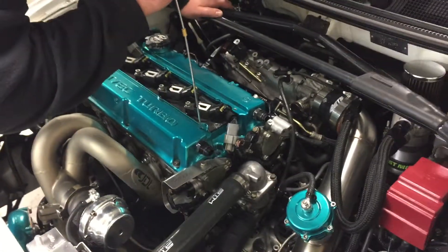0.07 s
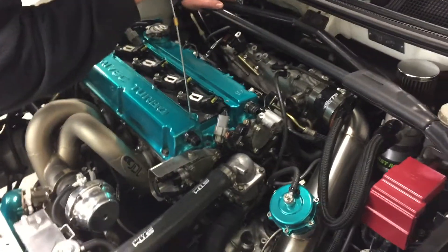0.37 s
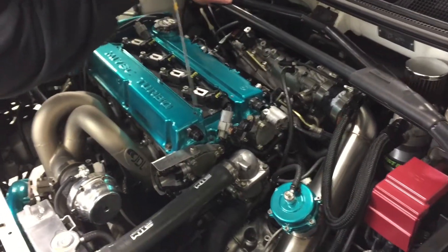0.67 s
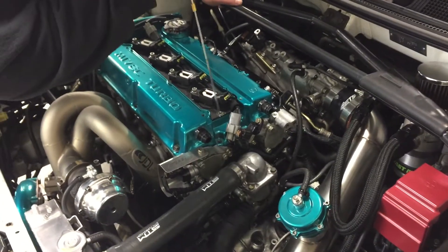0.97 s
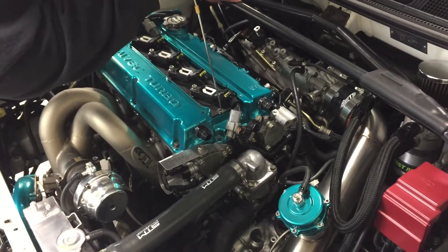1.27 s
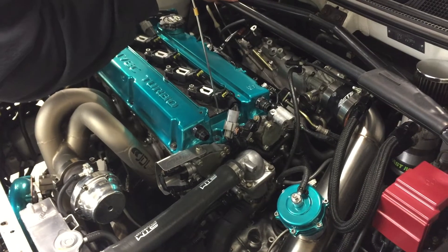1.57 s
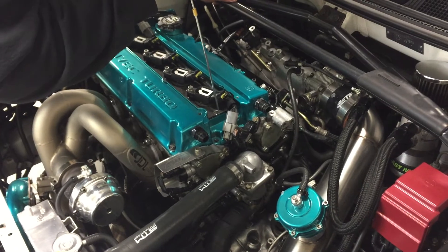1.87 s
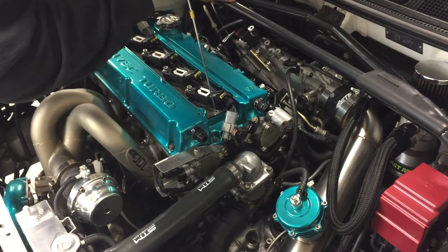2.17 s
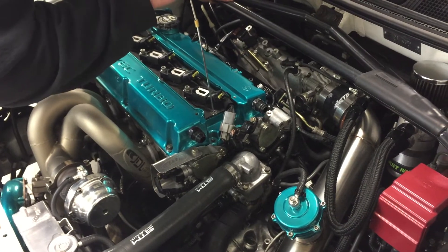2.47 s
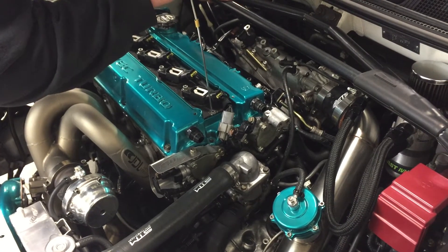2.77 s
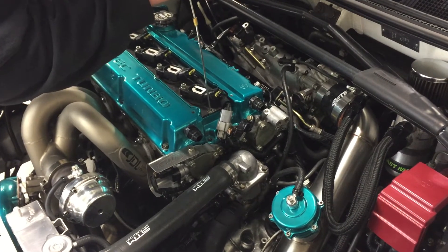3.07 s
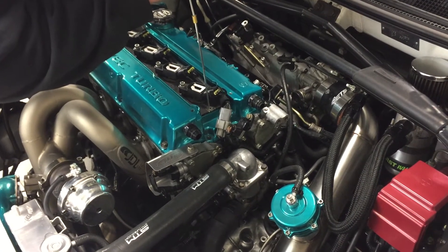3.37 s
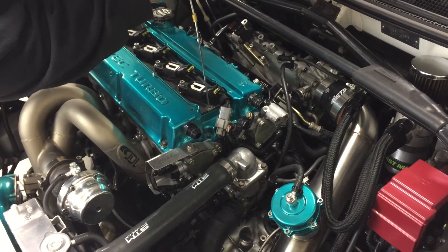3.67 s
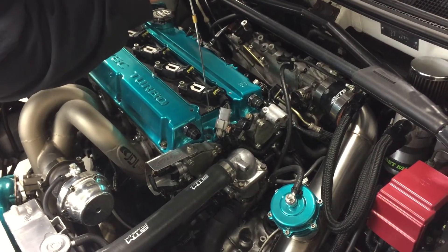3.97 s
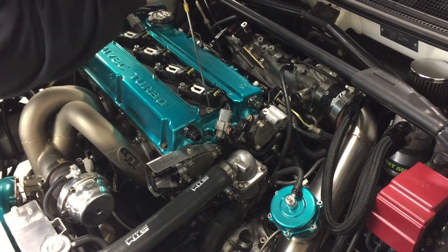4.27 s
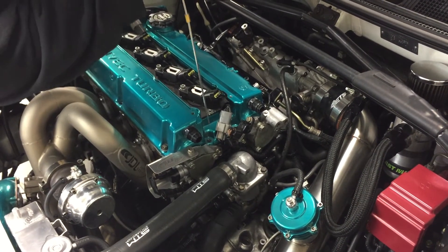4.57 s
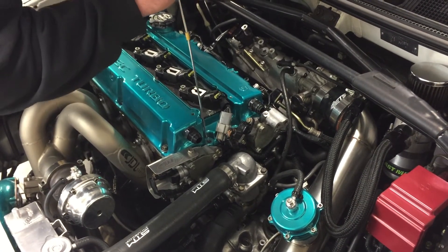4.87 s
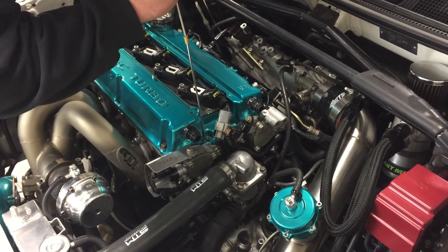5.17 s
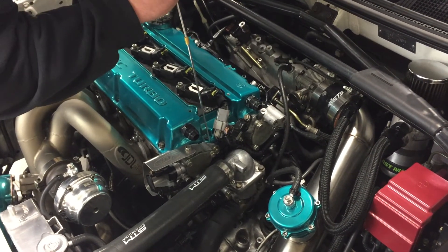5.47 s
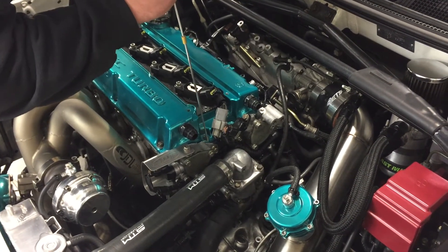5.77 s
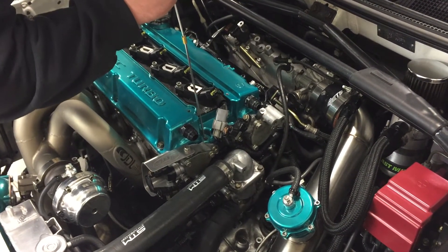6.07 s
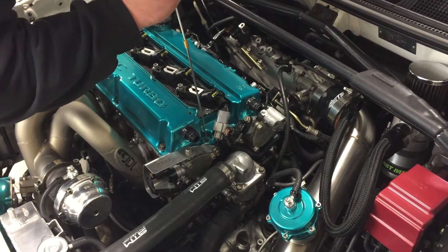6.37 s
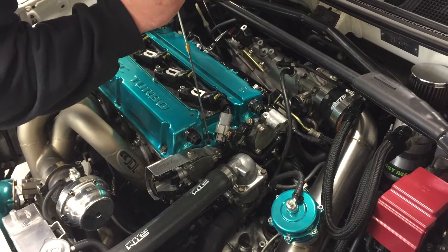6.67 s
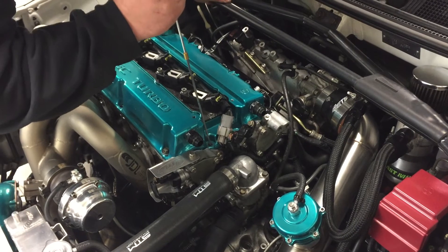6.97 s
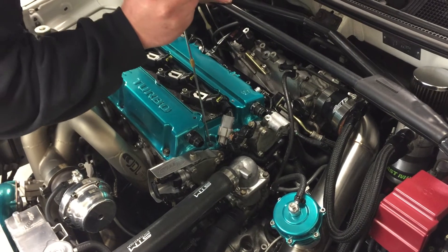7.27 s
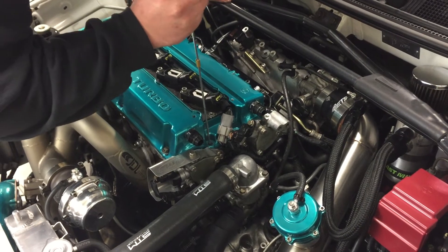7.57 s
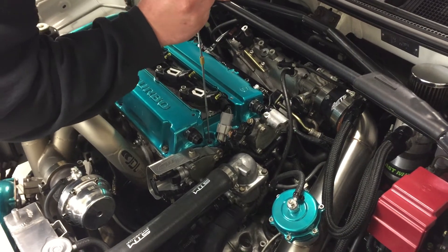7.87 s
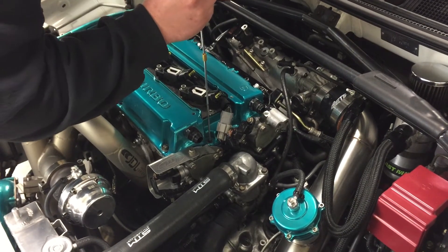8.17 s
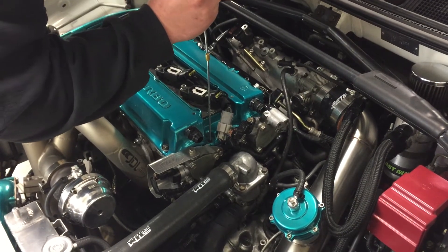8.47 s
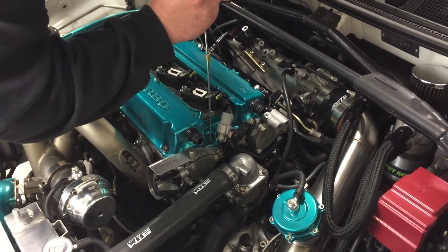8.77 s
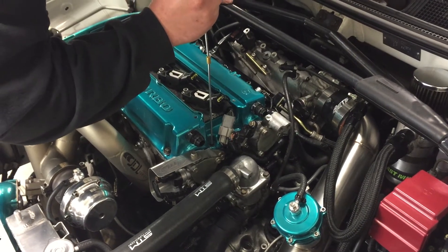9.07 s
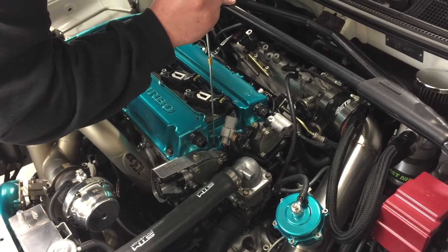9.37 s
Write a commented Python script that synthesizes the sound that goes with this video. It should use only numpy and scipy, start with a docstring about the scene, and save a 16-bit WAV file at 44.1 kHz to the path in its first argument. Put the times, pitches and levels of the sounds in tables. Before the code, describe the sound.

Heard from close above an open engine bay, a rapid, regular metallic ticking and knocking rides on the low drone of an idling car engine. It starts slightly harder and faster, then settles as the idle sinks. The engine speed keeps drifting gently up and down, with small dips in the exhaust hum. Belts and gears whirr softly behind, and the garage walls add a short tail to each tick.

```python
"""A loose valve lifter clacks in an idling four-cylinder engine, once per camshaft turn.
The microphone is a phone's, held just above the open engine bay in a garage.
Each clack rings the cylinder head and its cover; the other valves tick softly.
The idle sinks, hunts and stumbles, and the exhaust booms on multiples of the firing rate.
Belts and gears whirr behind it, and the walls add a short tail to the valve train."""
import sys
import numpy as np
from scipy import signal
from scipy.fft import rfft, irfft, next_fast_len
from scipy.io import wavfile
from scipy.ndimage import uniform_filter1d

SR = 44100
rng = np.random.default_rng(int(sys.argv[2]) if len(sys.argv) > 2 else 0)


def output_pcm(signal):
    """Save a mono or channel-first signal as 16-bit PCM at the path in sys.argv[1].

    Samples are clipped to [-1, 1] before scaling.
    """
    pcm = np.clip(np.atleast_2d(signal).T, -1, 1) * 32767
    wavfile.write(sys.argv[1], SR, np.round(pcm).astype(np.int16))


N = 420273
TIME = np.arange(N) / SR

# the cam cover's countless weaker rings: (frequency [Hz], gain [dB])
COVER_SPECTRUM = [(700, -43), (1100, -1.5), (2300, -0.5), (2950, -9.5), (4300, -6), (4950, -9.5),
                  (5900, 0.5), (7000, -3), (8700, 1), (9700, -5.5), (10400, -10), (12300, -6), (13600, -10),
                  (15000, -9.5)]


def lifter_blows(rest_db=-21.5, strain_db=3.5, scatter_db=0.13):
    """The loose lifter strikes once a camshaft turn, harder under strain: (time [s], strength [dB])."""
    times = turn_times()[1:-1]
    return np.c_[times, rest_db + strain_db * strain(times) + scatter_db * rng.standard_normal(len(times))]


def lifter_rasp(blows, gain_db=-5, attack_s=0.00031, hold_s=0.0078, tail_db=-21, tail_t60=0.073):
    """The lifter slaps its valve and rings the cover: nearly the same metallic rasp each time."""
    # bright rings of the cam cover: (frequency [Hz], relative level [dB], t60 [s])
    cover_modes = [(4407, -0.5, 0.038), (5220, -5.5, 0.092), (5993, 4.5, 0.042), (6240, -4, 0.03),
                   (6660, 7, 0.011), (7597, 4.5, 0.037), (8180, 2, 0.031), (8840, 3.5, 0.027),
                   (9520, 4, 0.028), (12400, 3.5, 0.022), (13200, -1, .025)]
    hz, mode_db, t60 = np.transpose(cover_modes)[:, :, None]
    size, ring_share, fresh_share = 2048, 0.45, 0.52
    out, t = np.zeros(N), np.arange(size) / SR
    ring_fade = undb(mode_db) * decay(t, t60)
    phase = rng.uniform(0, 2 * np.pi, hz.shape)
    contact = 1 - np.exp(-(t / attack_s) ** 2)
    # reflections inside the bay hold the burst up briefly before it dies
    fade = np.exp(-(t / hold_s) ** 1.41) + undb(tail_db) * decay(t, tail_t60)
    grains = rng.standard_normal((6, size))
    for s, db in blows:
        detune = 1 + 0.0046 * rng.standard_normal(hz.shape)
        rings = np.sum(ring_fade * np.sin(2 * np.pi * hz * detune * t + phase), axis=0)
        # the rasp's grain changes slowly as the phone moves
        blend = np.cos(np.arange(len(grains)) * np.pi * s / TIME[-1])
        grain = unit(blend @ grains) + fresh_share * rng.standard_normal(size)
        burst = flatten(grain * fade * contact)
        rasp = colour(np.r_[burst, np.zeros(size)], COVER_SPECTRUM)[:size]
        add(out, s, undb(gain_db + db) * unit(unit(rasp) + ring_share * unit(rings * contact)))
    return out


def head_knock(blows, gain_db=-2.5, scatter_db=1.1, size=1200):
    """Each clack shakes the cylinder head: a hollow tock that builds over a few milliseconds."""
    # head modes: (frequency [Hz], relative level [dB], swell time [s], extra under strain [dB])
    head_modes = [(631, -15, 0.0024, -6), (817, -21, 0.0071, -5), (1013, -5, 0.0028, 1.5),
                  (1158, -4, 0.0043, 1.5), (1207, -16, 0.0049, 4), (1467, 4.5, 0.0034, -2),
                  (1732, -15, 0.0042, 11.5), (1920, -15, 0.002, -16), (1998, -4, 0.0033, -5.5),
                  (2102, -1, 0.0019, -6), (2221, -5, 0.0018, 6), (2508, -15.5, 0.0038, 1),
                  (2538, -11, 0.0041, -14), (2678, -20, 0.0037, 11.5)]
    hz, mode_db, swell_s, strain_db = np.transpose(head_modes)[:, :, None]
    out, t = np.zeros(N), np.arange(size) / SR
    envelope = t / swell_s * np.exp(1 - t / swell_s)
    periods = np.diff(turn_times())
    for (s, db), period in zip(blows, periods):
        # a faster cam strikes harder, which lifts the knock a little in pitch
        lift = (periods.mean() / period) ** 0.29
        gain = undb(mode_db + strain_db * strain(s) + scatter_db * rng.standard_normal(hz.shape))
        tock = np.sum(gain * envelope * np.sin(2 * np.pi * hz * lift * t), axis=0)
        add(out, s, undb(gain_db + db) * tock)
    return out


def valve_ticks(gain_db=-11, attack_s=0.001, t60=0.053, scatter_db=3.0, size=3000):
    """The other valves seat softly at their own places in each turn."""
    # the healthy valves: (place in the camshaft turn [0-1], relative level [dB])
    seatings = [(0.219, -35), (0.369, -43), (.54, -40), (0.766, -19), (.81, -46)]
    out, t = np.zeros(N), np.arange(size) / SR
    envelope = (1 - np.exp(-t / attack_s)) * decay(t, t60)
    for place, db in seatings:
        voice = rng.standard_normal(size)
        for s in time_of_turn(np.arange(len(turn_times()) - 1) + place):
            gain = undb(db + scatter_db * rng.standard_normal())
            grain = voice / 2 + 1.02 * rng.standard_normal(size)
            add(out, s, gain * envelope * grain)
    return undb(gain_db) * colour(out, COVER_SPECTRUM)


def exhaust_hum(boom_hz=138.3, boom_width_hz=30.0, travel_s=0.0376, rest_rpm=1335):
    """Four firings per camshaft turn travel down the exhaust and hum in five clean tones."""
    # multiples of the firing rate: (level at rest [dB], extra under strain [dB],
    # change with speed [dB/rpm], share of a stumble's sag [ratio; below 0 the tone swells])
    harmonics = [(-39.5, 6, 0.05, 0.13), (-33.5, 8.5, -0.0058, -0.54), (-17, -4, 0.0215, 0.95),
                 (-27, -1.5, -0.0356, 0.6), (-35.5, -5, 0, -0.39)]
    firings = 4 * (turns_at(TIME - travel_s) - 0.0763)
    rpm, load, sag_db = crank_rpm(), strain(TIME), stumble_sag()
    firing_hz = 2 * rpm / 60
    # the hum weakens at one place in each turn, more so under strain
    limp_db = -(0.3 + 0.95 * load) * np.cos(2 * np.pi * (turns_at(TIME) - 0.65))
    out = np.zeros(N)
    for k, (rest_db, strain_db, db_per_rpm, share) in enumerate(harmonics, 1):
        # the exhaust resonance delays each tone by how far above it the tone lies
        phase_lag = 2 * np.arctan(2 * (k * firing_hz - boom_hz) / boom_width_hz)
        db = rest_db + strain_db * load + db_per_rpm * (rpm - rest_rpm) + limp_db + share * sag_db
        out -= np.sqrt(2) * undb(db) * np.cos(2 * np.pi * k * firings - phase_lag)
    return out


def stumble_sag(rebound_share=0.34, rebound_after_s=0.18, rebound_half_s=0.06):
    """A few weak firings let the boom sag, then the engine pulls itself up: a curve in dB."""
    # stumbles: (time [s], half length [s], depth [dB])
    stumbles = [(0.77, 0.043, 5), (3.56, 0.045, 7), (3.859, 0.048, 2), (4.293, 0.018, 5),
                (4.657, 0.014, 10), (4.857, 0.04, 9), (5.307, 0.018, 2), (6.403, 0.014, 7),
                (6.728, 0.04, 7), (8.704, 0.054, 6.5), (8.889, 0.08, 9)]
    sag_db = np.zeros(N)
    for s, half_s, depth_db in stumbles:
        dip = np.exp(-((TIME - s) / half_s) ** 2)
        rebound = np.exp(-((TIME - s - rebound_after_s) / rebound_half_s) ** 2)
        sag_db += depth_db * (rebound_share * rebound - dip)
    return sag_db


def exhaust_throb(level_db=-30.0, limp_db=6.5, lag_s=0.00492, jitter_s=0.00026, scatter=0.13):
    """The cylinders never fire quite alike; their differences throb in the pipes."""
    # manifold and bay resonances, each passed twice:
    # (frequency [Hz], width of one pass [Hz], gain [dB], extra under strain [dB])
    resonances = [(121.8, 29, 2, -5), (156.8, 26, 16, 3), (232, 25.6, 3, 4.5), (311.5, 31, 4.5, 5.5),
                  (426.6, 13, -9, 9)]
    imbalance = (0.07, 0.03, -0.2, -0.02)
    pulses, load = np.zeros(N), strain(TIME)
    firing_times = time_of_turn(np.arange(4 * (len(turn_times()) - 1)) / 4)
    for k, s in enumerate(firing_times):
        strength, late = rng.standard_normal(2)
        # under strain the engine limps once a turn
        uneven = undb(limp_db * strain(s)) * imbalance[k % 4] + scatter * strength
        add(pulses, s + lag_s + jitter_s * late, np.array([uneven]))
    throb = sum(undb(db + strain_db * load) * resonate(resonate(pulses, hz, width), hz, width)
                for hz, width, db, strain_db in resonances)
    return undb(level_db) * unit(throb)


def belt_whirr(rest_db=-35.5, strain_db=5.5, rub_gain_db=4.0, taps_per_s=600, tap_decay_s=0.0038):
    """Belts and gears rub, a little harder at each firing; their slack chatters and a few parts sing."""
    # belts, gears and oil: (frequency [Hz], gain [dB])
    rub_spectrum = [(20, -3), (60, 7), (110, 12), (200, 16), (400, -1), (760, -5), (1120, 2.5),
                    (1320, -4.5), (1550, -1.5), (2400, -8.5), (2900, -8.5), (4200, -9.5), (6200, -22),
                    (9500, -19), (15500, -28)]
    # thin wavering tones: (frequency [Hz], width [Hz], relative level [dB], extra under strain [dB])
    singing_parts = [(432.5, 4, -15.5, 0), (551, 4.6, -17, 1), (2057, 13.8, -16, -1), (2525, 9.4, -14, -9)]
    load = strain(TIME)
    firing_phase = 2 * np.pi * 4 * turns_at(TIME)
    pulsing = undb(-1.3 * np.cos(firing_phase - 1.5))
    taps = (rng.random(N) < taps_per_s / SR) * rng.rayleigh(size=N)
    chatter = signal.lfilter([1], [1, -np.exp(-1 / (tap_decay_s * SR))], taps)
    friction = rng.standard_normal(N) * pulsing * np.hypot(1, 0.37 * chatter)
    rub = undb(rub_gain_db) * unit(colour(friction, rub_spectrum))
    tones = sum(undb(db + extra_db * load) * waver(hz, width) for hz, width, db, extra_db in singing_parts)
    return undb(rest_db + strain_db * load) * (rub + tones)


def garage(x, wet_db=-12, t60=0.33, build_s=0.011, size=22050):
    """Bonnet, walls and floor scatter the clacks into a short, duller tail."""
    t = np.arange(size) / SR
    tail = colour(rng.standard_normal(size), [(500, -18), (2500, 8), (7000, 0.0), (15000, 0.5)])
    tail *= (1 - np.exp(-(t / build_s) ** 2)) * decay(t, t60)
    return x + undb(wet_db) * signal.fftconvolve(x, tail / np.linalg.norm(tail))[:N]


def strain(s):
    """Strain on the engine at time s."""
    # the strain eases as the idle settles: (time [s], strain [0-1])
    easing = [(0, 1), (1.35, 0.91), (1.9, 0.6), (2.6, 0.3), (2.95, 0.2)]
    return np.interp(s, *np.transpose(easing))


def turn_times(first_turn_s=0.034):
    """Start of each camshaft turn (two of the crank), with one more at either end."""
    turns = np.cumsum(crank_rpm() / 60 / 2) / SR
    turns -= np.interp(first_turn_s, TIME, turns)
    starts = np.interp(np.arange(int(turns[-1]) + 1), turns, TIME)
    return np.r_[2 * starts[0] - starts[1], starts, 2 * starts[-1] - starts[-2]]


def crank_rpm():
    """Crank speed at every sample."""
    # the idle sinks, then hunts around its resting speed: (time [s], crank speed [rpm])
    idle_speed = [(0.0, 1439.0), (0.29, 1403.0), (0.6, 1416.2), (1.28, 1405.6), (1.85, 1365.0),
                  (2.68, 1362.9), (2.8, 1320.2), (3.75, 1309.5), (4.25, 1341.5), (4.76, 1293.5),
                  (5.6, 1358.1), (6.2, 1342.6), (6.79, 1290.0), (7.3, 1367.8), (7.48, 1332.9),
                  (7.95, 1374.2), (8.21, 1357.7), (8.77, 1262.9), (9.41, 1369.6), (9.53, 1331.5)]
    return np.interp(TIME, *np.transpose(idle_speed))


def time_of_turn(turn):
    """Time at which the camshaft has made so many turns."""
    starts = turn_times()
    return np.interp(turn, np.arange(len(starts)), starts)


def turns_at(t):
    """Camshaft turns made by time t."""
    starts = turn_times()
    return np.interp(t, starts, np.arange(len(starts)))


def waver(hz, width_hz):
    """A tone of rms 1 whose phase drifts, spreading it over a small width."""
    drift = np.sqrt(2 * np.pi * width_hz / SR) * np.cumsum(rng.standard_normal(N))
    return np.sqrt(2) * np.sin(2 * np.pi * hz * TIME + drift)


def flatten(x, span_hz=160):
    """Even out the spectrum of a burst, keeping its grain in time."""
    spectrum = rfft(x, 2 * len(x))
    power = uniform_filter1d(np.abs(spectrum) ** 2, max(int(span_hz * 2 * len(x) / SR), 1))
    return irfft(spectrum / np.sqrt(power + 1e-18))[:len(x)]


def colour(x, points):
    """Filter x by points of (frequency [Hz], gain [dB])."""
    hz, db = np.transpose(points)
    size = next_fast_len(len(x))
    f = np.arange(size // 2 + 1) * SR / size
    gain = undb(np.interp(np.log(f + 1), np.log(hz), db))
    return irfft(rfft(x, size) * gain, size)[:len(x)]


def resonate(x, hz, width_hz):
    """One resonance, gain 1 at its centre."""
    return signal.lfilter(*signal.iirpeak(hz, hz / width_hz, fs=SR), x)


def add(track, s, sound):
    """Mix a sound into the track at time s."""
    i = int(s * SR)
    a, b = max(i, 0), min(i + len(sound), N)
    if b > a:
        track[a:b] += sound[a - i:b - i]


def decay(t, t60):
    """Fall by 60 dB every t60 seconds."""
    return np.exp(-np.log(1000) * t / t60)


def undb(db):
    return 10 ** (np.asarray(db) / 20)


def unit(x):
    """Scale to rms 1."""
    return x / np.sqrt(np.mean(x ** 2))


def scene():
    """Just above the bay, the valve train ticks in the garage over the exhaust and the whirr."""
    blows = lifter_blows()
    valve_train = head_knock(blows) + lifter_rasp(blows) + valve_ticks()
    return (garage(valve_train) + exhaust_hum() + exhaust_throb() + belt_whirr())[None]


def record(dry, top_hz=15250):
    """The phone cuts the top."""
    return signal.sosfilt(signal.ellip(10, .2, 70, top_hz, fs=SR, output="sos"), dry)


dry = scene()
out = record(dry)
output_pcm(out)
```